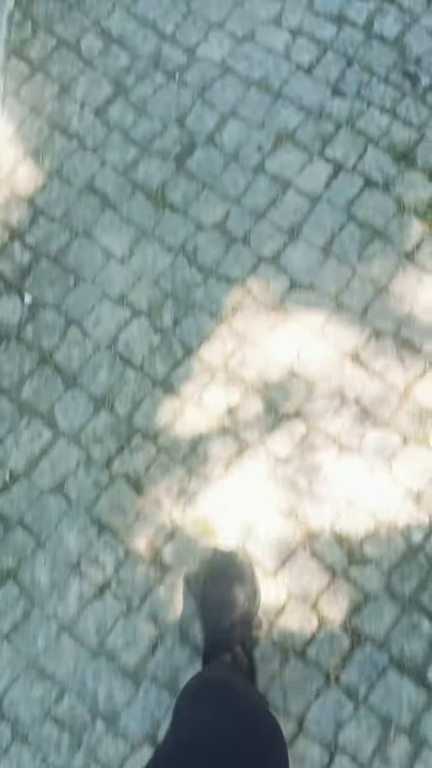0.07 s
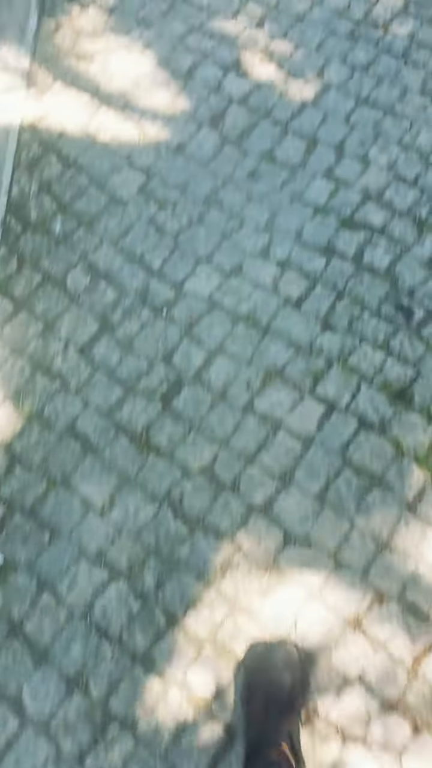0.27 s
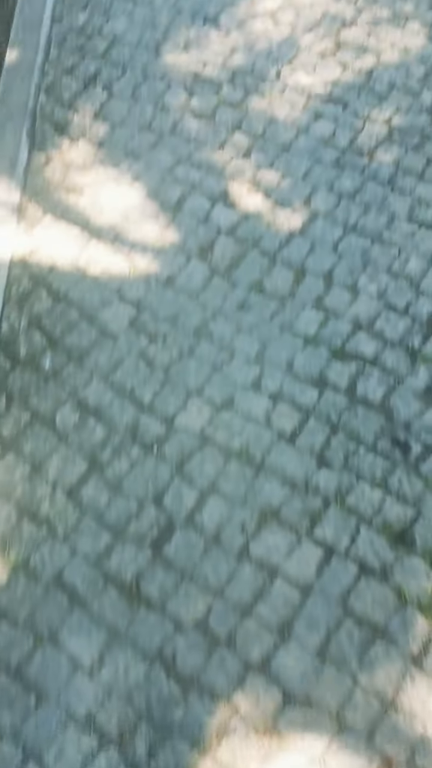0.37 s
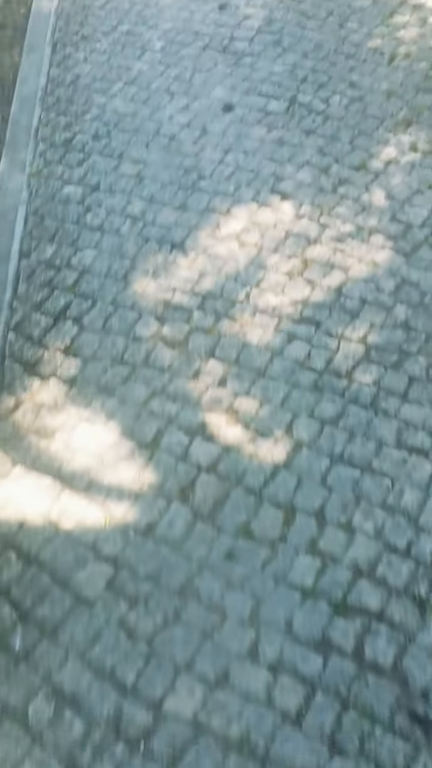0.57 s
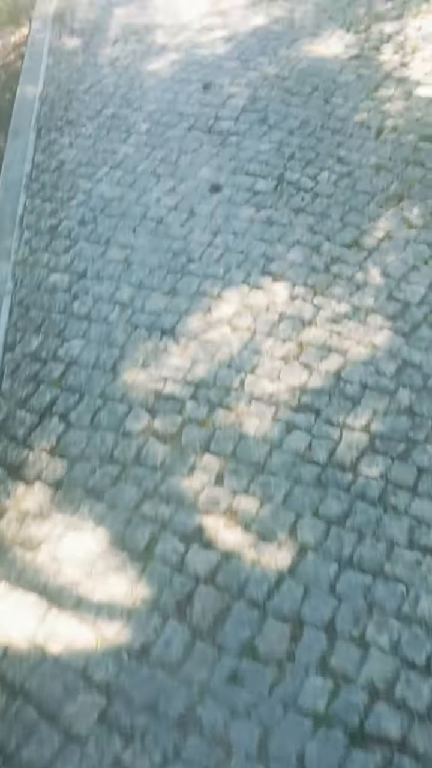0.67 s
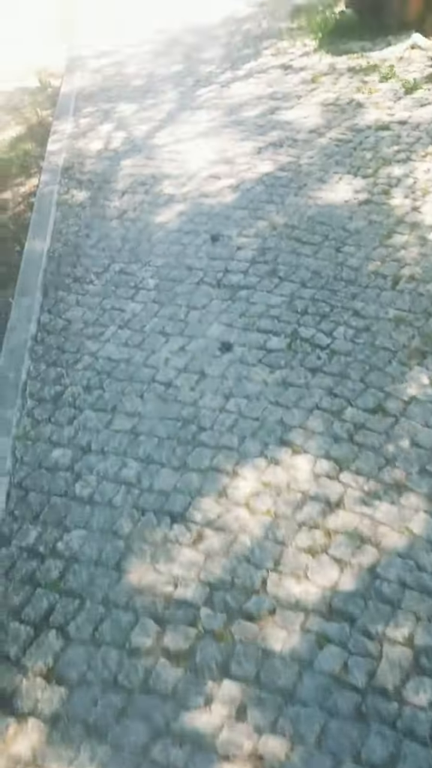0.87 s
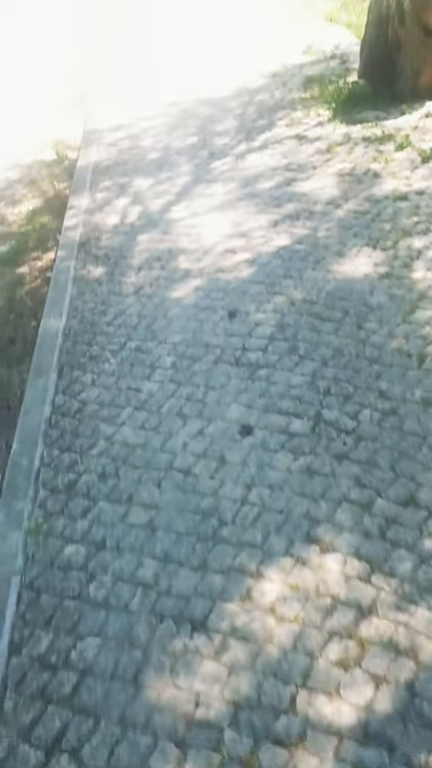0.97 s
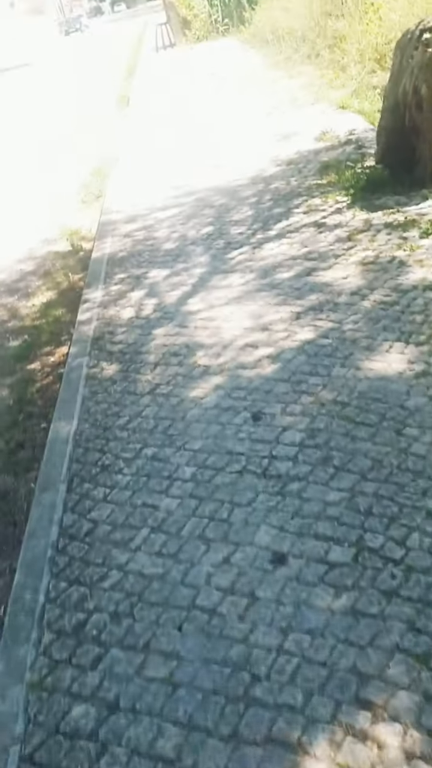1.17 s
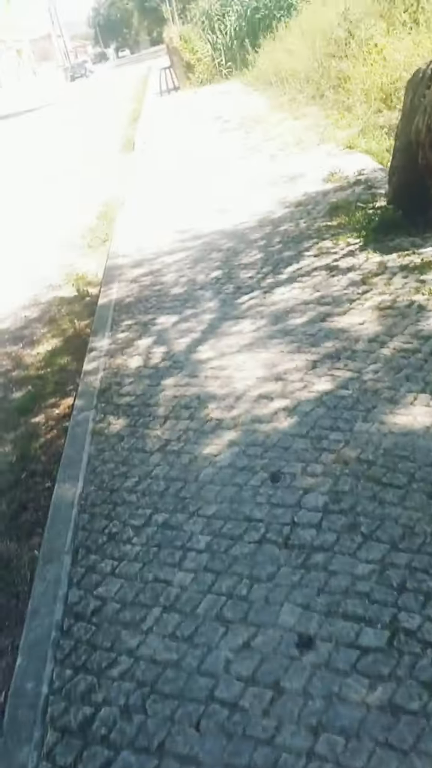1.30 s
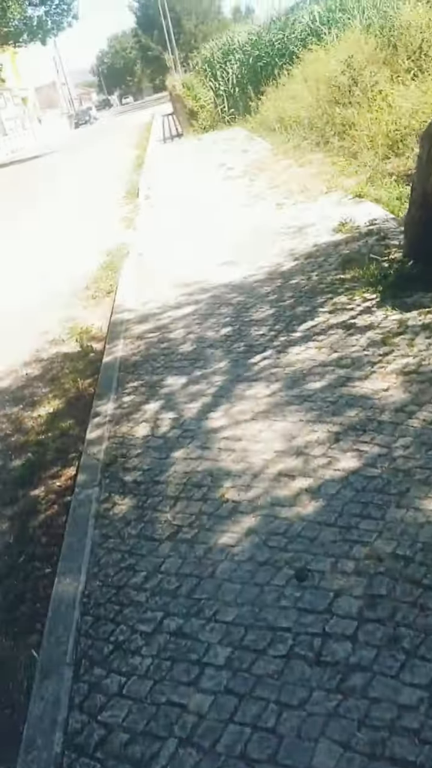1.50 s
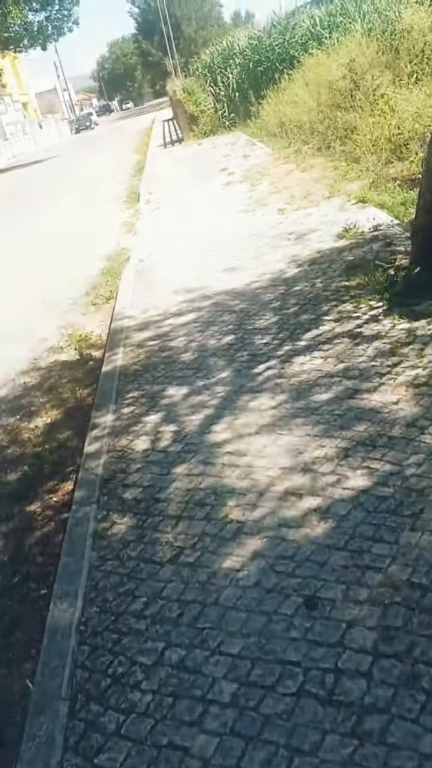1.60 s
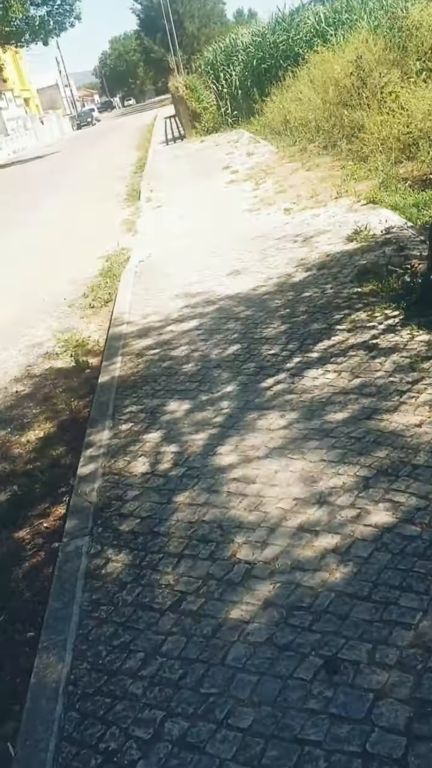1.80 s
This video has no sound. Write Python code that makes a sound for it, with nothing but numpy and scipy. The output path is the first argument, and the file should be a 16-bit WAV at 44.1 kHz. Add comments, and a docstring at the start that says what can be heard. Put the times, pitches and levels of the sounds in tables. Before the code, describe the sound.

Small birds chirp far off, then one songbird whistles a quick, clear phrase among the trees. Soft footsteps scuff a cobbled path, while clothing rustle, wind rumble and handling bumps touch the microphone, mostly early on.

```python
"""A walk under the trees

Soft footsteps scuff a cobbled path and clothing rustles. Small birds chirp far off, then one songbird
whistles a phrase; both echo among the trees. Moving air and handling bump the two microphone openings
(ports), over a faint background of far roads, stirring leaves and microphone hiss."""
import sys
import numpy as np
from scipy import signal
from scipy.fft import rfft, irfft, next_fast_len
from scipy.io import wavfile
from scipy.ndimage import map_coordinates

SR = 44100
rng = np.random.default_rng(int(sys.argv[2]) if len(sys.argv) > 2 else 0)


def pcm_store(signal):
    """Save signal as 16-bit PCM."""
    levels = np.round(np.clip(np.atleast_2d(signal), -1, 1) * 32767)
    wavfile.write(sys.argv[1], SR, levels.astype(np.int16).T)


N = 81585


def amp(db):
    """Turn decibels into a gain to multiply by."""
    return 10 ** (np.asarray(db) / 20)


def unit(x):
    """Scale a sound to an average (rms) level of 1."""
    return x / np.sqrt(np.mean(x ** 2) + 1e-20)


def clock():
    """The time of each sample, in seconds."""
    return np.arange(N) / SR


def along(points, hz):
    """Read between (pitch_hz, value) points on a log pitch scale."""
    pitches, values = np.transpose(points)
    return np.interp(np.log(hz + 1), np.log(pitches + 1), values)


def curve(points):
    """Join (time_s, value) points with straight lines."""
    return np.interp(clock(), *np.transpose(points))


def wobble(rate):
    """A smooth curve through `rate` random values a second."""
    return map_coordinates(rng.standard_normal(4096), [clock() * rate], mode="wrap")


def pan(left_db):
    """Two gains that make the left side left_db louder than the right."""
    return amp(np.array([[left_db], [-left_db]]) / 2)


def filtered(x, response):
    """Multiply each frequency in x by response(hz)."""
    size = next_fast_len(N + SR // 2)
    return irfft(rfft(x, size) * response(np.fft.rfftfreq(size, 1 / SR)), size)[..., :N]


def rush(tone):
    """Stereo noise with the given tone; the two sides are more alike in the bass."""
    # how alike left and right are: pitch_hz, likeness (0 to 1)
    alike = [(100, 0.87), (350, 0.8), (1000, 0.19), (3000, 0.067), (10000, 0.017)]

    def response(hz):
        angle = np.arccos(np.clip(along(alike, hz), -1, 1)) / 2
        return amp(along(tone, hz)) * [np.cos(angle), np.sin(angle)]

    mid, side = filtered(rng.standard_normal((2, N)), response)
    return unit(np.array([mid + side, mid - side]))


def background(flicker_db=2.48, hiss_db=-73.5):
    """A dull hum from far roads, faintly stirring leaves and steady microphone hiss."""
    # tone of each noise: pitch_hz, level_db
    hum_tone = [(60, -27), (150, -7.5), (250, -4.5), (370, 1), (520, -7.5), (950, -20), (2000, -39),
                (6000, -55)]
    leaf_tone = [(300, -30), (700, -14), (1250, -15.5), (1700, -13.5), (2700, -14), (4400, -18),
                 (5800, -23), (7800, -25), (9000, -29), (11500, -29), (15500, -34)]
    hiss_tone = [(500, -3), (3000, -2), (5500, 1), (7700, 0), (9000, -2), (11500, -1.5), (15500, -6)]
    # how roads and leaves rise and fall: time_s, level_db
    hum_level = [(0, -64), (.55, -68.5), (.72, -65), (.9, -73), (.99, -65), (1.1, -67.5), (1.2, -63),
                 (1.35, -71.5), (1.58, -69), (1.7, -66.5), (1.85, -70)]
    leaf_level = [(0, -69), (.53, -70), (.6, -74), (.69, -77), (.75, -70), (.92, -74), (1, -70),
                  (1.1, -70.5), (1.25, -66.5), (1.4, -70.5), (1.58, -70.5), (1.7, -69.5), (1.85, -67)]
    hum = amp(curve(hum_level) + flicker_db * wobble(24.94)) * rush(hum_tone)
    leaves = amp(curve(leaf_level)) * rush(leaf_tone)
    return hum + leaves + amp(hiss_db) * rush(hiss_tone)


def moving_air(lumps_db=3.0):
    """Moving air rumbles unevenly on each port separately."""
    # gusts on each port: time_s, level_db
    left_gusts = [(0, -45), (.16, -50), (.3, -42.5), (.34, -32), (.46, -29), (.53, -39), (.59, -64),
                  (.76, -89), (.81, -49), (.9, -80), (1.02, -57.5), (1.2, -65.5), (1.32, -66), (1.42, -71),
                  (1.59, -77), (1.66, -64.5), (1.75, -59.5), (1.85, -66)]
    right_gusts = [(0, -55), (.12, -50), (.26, -47), (.37, -72), (.46, -45), (0.524, -39.5), (.58, -54.5),
                   (.69, -69), (.78, -45), (.9, -80), (1, -55), (1.06, -71), (1.25, -60), (1.45, -65.5),
                   (1.59, -65.5), (1.66, -62.5), (1.75, -58), (1.85, -63)]
    # tone of the rumble: pitch_hz, level_db
    tone = [(18, -34), (30, -18.5), (45, -3), (65, 0), (105, -6.5), (160, -16.5), (300, -30), (500, -41.5),
            (1000, -59), (3000, -100)]
    noise = filtered(rng.standard_normal((2, N)), lambda hz: amp(along(tone, hz)))
    rumble = [unit(port * amp(lumps_db * wobble(30.12))) for port in noise]
    return amp([curve(left_gusts), curve(right_gusts)]) * rumble


def clothing(grain_db=1.5, left_db=5.5):
    """Fabric rubs close to the left port, mostly during the first stride."""
    # strength of the rubbing: time_s, level_db
    rubbing = [(0, -64.5), (.12, -62), (.22, -60.5), (.32, -63), (.4, -62.5), (.52, -65), (.58, -72.5),
               (.7, -78), (1.85, -76)]
    # tone of the fabric: pitch_hz, level_db
    tone = [(100, 12), (350, 5.5), (800, -1.5), (1500, -6), (2800, 0.5), (4800, 2.5), (7000, -6.5),
            (9000, -15), (15000, -24)]
    rustle = unit(rush(tone) * amp(grain_db * wobble(300)))
    return pan(left_db) * amp(curve(rubbing)) * rustle


def tree_echo(x, build_up_s=0.0093):
    """Trunks and leaves scatter a sound into a soft echo, different at each port."""
    # time the echo takes to fade by 60 dB: pitch_hz, fade_s
    fade_times = [(500, 0.18), (3500, 0.39), (12000, 0.071)]
    hz, t, noise = signal.stft(rng.standard_normal((2, SR // 2)), SR, nperseg=256)
    build_up = np.clip(t / build_up_s, 0, 1)
    fade = amp(-60 * t / along(fade_times, hz)[:, None])
    tail = signal.istft(noise * build_up * fade, SR, nperseg=256)[1]
    return signal.fftconvolve(x[None], tail / np.linalg.norm(tail[0]), axes=1)[:, :N]


TOP_HZ = 15700  # upper limit for the birds' overtones and the recorder


def bird(notes, waver, flutter_db, left_db, echo_db):
    """Each note is a whistle gliding along an arc, with weak overtones and an echo."""
    # a loud note's overtones, relative to the note: pitch_hz, level_db
    overtone_levels = [(5000, -36), (10500, -39), (12800, -18), (14200, -36), (15500, -56)]
    loud_note_db = -46.5  # softer notes are purer
    attack_s, release_s = .009, .005
    lag_s = .00007  # the left port hears the bird first
    song = np.zeros(N)
    for start_s, length_s, start_hz, middle_hz, end_hz, level_db, swell_db in notes:
        t = clock() - start_s
        progress = np.clip(t / length_s, 0, 1)
        arc_hz = (2 * middle_hz - start_hz - end_hz) * 2 * progress * (1 - progress)
        hz = start_hz + (end_hz - start_hz) * progress + arc_hz
        phase = 2 * np.pi * np.cumsum(hz * (1 + waver * wobble(600))) / SR
        overtones = sum(amp(along(overtone_levels, k * hz)) * np.sin(k * phase) * (k * hz < TOP_HZ)
                        for k in (2, 3, 4))
        whistle = np.sin(phase) + amp(level_db - loud_note_db) * overtones
        gate = np.clip(t / attack_s, 0, 1) * np.clip((length_s - t) / release_s, 0, 1)
        level = np.sqrt(2) * amp(level_db + swell_db * (progress - .5))
        song += level * np.sin(gate * np.pi / 2) ** 2 * whistle
    ports = filtered(song, lambda hz: np.exp(1j * np.pi * hz * lag_s * np.array([[1], [-1]])))
    direct = ports * amp(flutter_db * np.array([wobble(130), wobble(110)]))
    return pan(left_db) * (direct + amp(echo_db) * tree_echo(song))


def far_birds():
    """Small birds give thin, wavering chirps off to the left."""
    # chirps: start_s, length_s, start_hz, middle_hz, end_hz, level_db, swell_db (rise over the note)
    chirps = [(.07, 0.051, 5250, 5150, 5100, -68.5, 0), (.13, 0.045, 7400, 7160, 6580, -63, 2),
              (.163, 0.015, 5900, 5100, 4100, -51, -14), (.205, 0.04, 7900, 7420, 7050, -66, -8),
              (.318, 0.0484, 4870, 4990, 5070, -59.5, 5), (.349, 0.013, 3600, 3980, 4170, -57.5, 0),
              (.376, 0.018, 4300, 3870, 3700, -57.5, -9), (.403, .063, 4030, 4376, 4620, -58, -2),
              (.468, .026, 4900, 5100, 5440, -63, 5), (.530, 0.013, 4410, 5390, 5850, -51.5, -2),
              (.539, 0.02, 5600, 5233, 4780, -55, 5), (.613, 0.0213, 5560, 5130, 4820, -58.5, -7),
              (.766, 0.031, 3550, 3300, 3510, -74, 5), (.811, 0.025, 4140, 4140, 4080, -64, -5),
              (.837, .016, 4290, 4290, 4300, -65, 23), (1.168, 0.043, 4940, 4930, 5250, -70.5, -4)]
    return bird(chirps, waver=0.0203, flutter_db=3.0, left_db=6.0, echo_db=-10.5)


def footsteps(grit_db=4.5):
    """Each sole rubs the cobbles, swelling into a short gritty scuff."""
    # steps: peak_s, rise_s, fade_s (time to drop 30 dB), level_db
    steps = [(.24, 0.01, 0.15, -58), (0.741, 0.018, 0.083, -67.5), (1.247, 0.028, 0.097, -54),
             (1.776, 0.037, 0.36, -62)]
    # tone of a sole on stone: pitch_hz, level_db
    tone = [(100, -7), (250, -0.5), (380, 2.5), (650, -11), (1400, -11), (2600, -12), (5000, -24),
            (9000, -27.5), (15000, -32)]
    level = np.zeros(N)
    for peak_s, rise_s, fade_s, level_db in steps:
        t = clock() - peak_s
        level += amp(level_db) * np.where(t < 0, np.exp(-abs(t) / rise_s), amp(-30 * abs(t) / fade_s))
    return level * unit(rush(tone) * amp(grit_db * wobble(700)))


def handling_bumps(width_cycles=.85):
    """Dull pushes on the microphone housing, each about one swing long."""
    # pushes: peak_s, pitch_hz, level_db, left_db (left minus right)
    pushes = [(.335, 77.2, -35.5, 30.5), (.398, 125, -35.5, 30.5), (0.399, 248, -39, 20),
              (0.436, 321, -44.5, 23), (0.437, 143, -44, 25), (0.442, 67.5, -40, 32.5),
              (0.457, 79, -41, 33), (0.482, 81, -37.5, 21), (0.536, 101, -39.5, -2), (0.811, 67, -50, -7),
              (1.309, 92, -52.5, 16), (1.73, 57.5, -53, 4)]
    out = np.zeros((2, N))
    for peak_s, pitch_hz, level_db, left_db in pushes:
        cycles = (clock() - peak_s) * pitch_hz
        thump = np.cos(2 * np.pi * cycles) * np.exp(-(cycles / width_cycles) ** 2)
        out += pan(left_db) * amp(level_db) * thump
    return out


def songbird():
    """One bird whistles a phrase of quick, clear notes."""
    # notes: start_s, length_s, start_hz, middle_hz, end_hz, level_db, swell_db (rise over the note)
    phrase = [(1.063, 0.017, 3450, 3430, 3480, -68, -11), (1.085, 0.022, 3500, 3360, 3330, -76, 0),
              (1.101, 0.019, 3240, 2860, 2550, -56, -9), (1.13, 0.046, 2220, 2103, 2090, -68.5, -5),
              (1.214, 0.033, 2393, 2525, 2570, -56.5, 5), (1.252, 0.024, 2445, 2530, 2420, -57, -7),
              (1.309, .028, 3670, 3950, 3760, -60.5, 4), (1.393, 0.041, 3830, 3993, 3890, -60, 11.5),
              (1.428, 0.021, 3790, 3790, 3300, -58, 10), (1.468, .026, 3190, 3445, 3390, -55.5, -3),
              (1.491, .026, 3474, 2857, 2230, -52.5, -12), (1.594, 0.072, 3380, 3530, 3490, -50.5, 11),
              (1.709, 0.027, 4260, 4375, 4440, -52.5, 7), (1.734, .052, 4310, 4187, 3840, -51, -11),
              (1.836, 0.043, 2460, 2730, 2700, -56.5, -7)]
    return bird(phrase, waver=.004, flutter_db=1.1, left_db=1.0, echo_db=-11.5)


def scene():
    """Open air, walker and birds together."""
    outdoors = background() + moving_air()
    return outdoors + clothing() + far_birds() + footsteps() + handling_bumps() + songbird()


def record(dry):
    """The recorder keeps nothing above TOP_HZ."""
    return filtered(dry, lambda hz: hz < TOP_HZ)


dry = scene()
out = record(dry)
pcm_store(out)
```